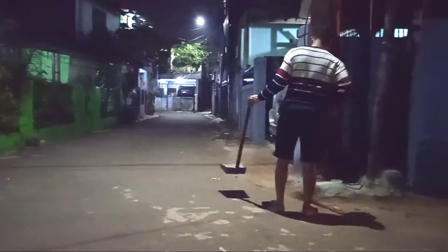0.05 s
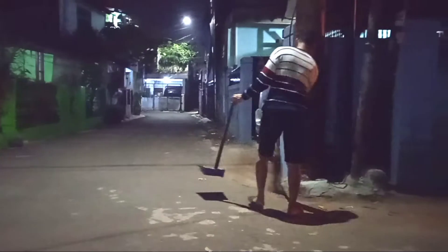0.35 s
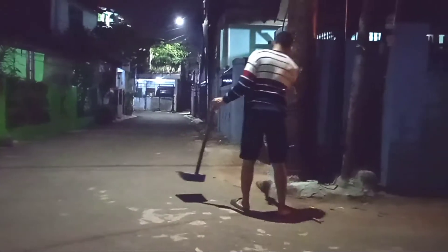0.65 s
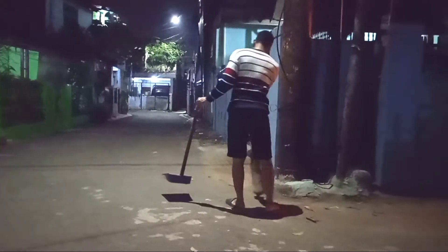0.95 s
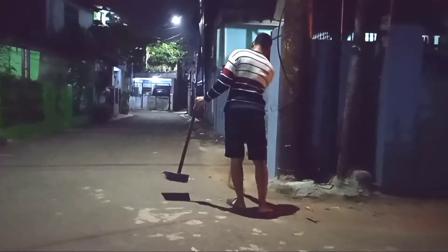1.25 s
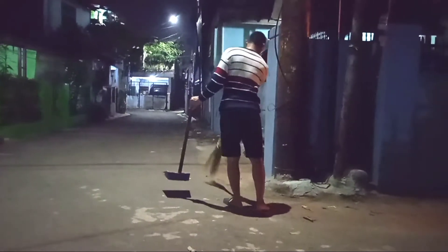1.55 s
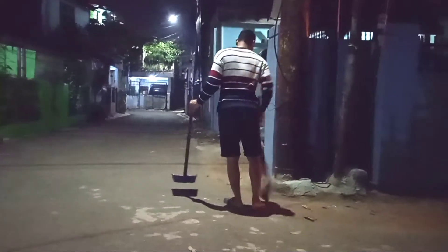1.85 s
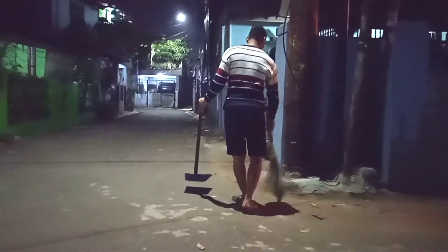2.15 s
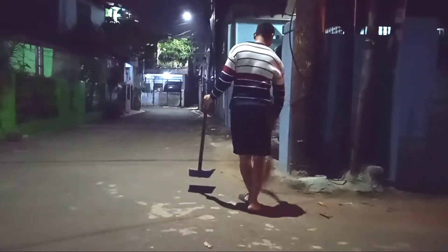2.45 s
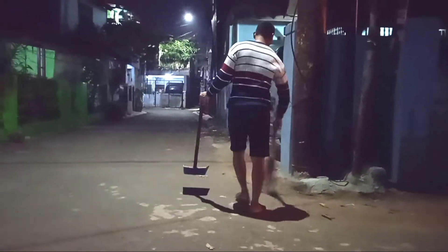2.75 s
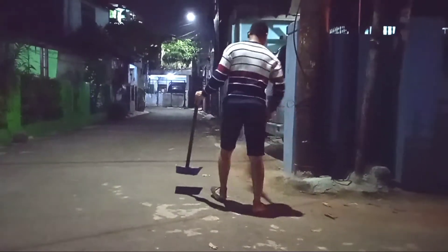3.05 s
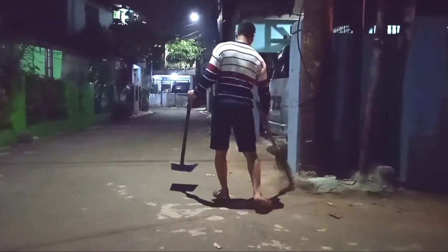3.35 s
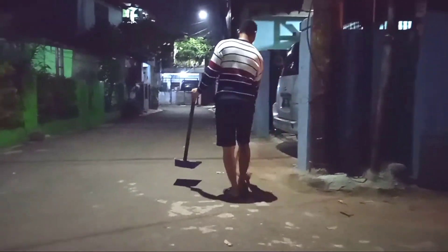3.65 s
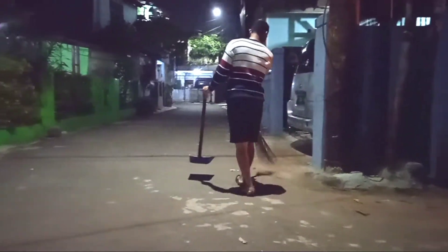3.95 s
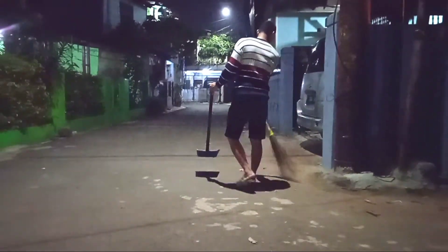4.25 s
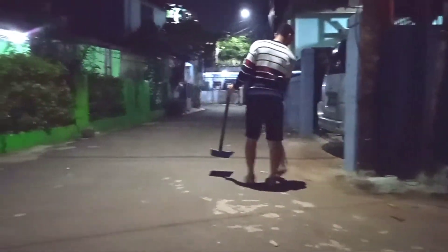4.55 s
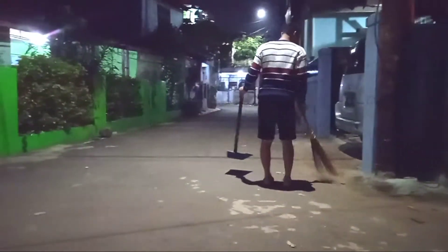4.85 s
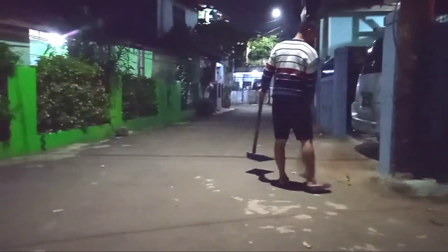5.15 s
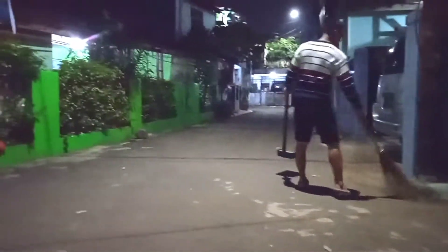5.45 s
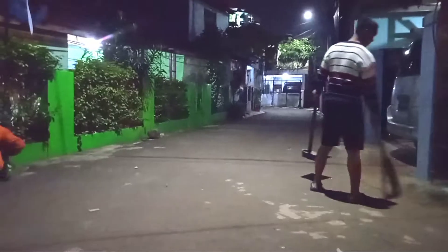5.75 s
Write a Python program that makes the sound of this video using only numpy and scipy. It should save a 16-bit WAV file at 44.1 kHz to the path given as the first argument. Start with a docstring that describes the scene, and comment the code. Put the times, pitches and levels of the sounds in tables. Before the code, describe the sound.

A stiff stick broom sweeps a paved lane, a few metres from a phone microphone. Thirteen dry, scratchy strokes come about two a second, each a bright hiss of bristle tips with a rasp of bending sticks and a short echo off the house fronts. The first four, up to about 1.5 seconds, are light and brief, with tiny ticks of flung grit among them. A dustpan gives one small, sharp knock at about 1.2 seconds. From 1.7 seconds the strokes become fuller and raspier, the strongest at around 3.4 seconds. Slightly softer sweeps follow near 3.9, 4.3 and 4.8 seconds. A longer stroke from 5.3 seconds catches on the rough ground, and a grain of grit ticks clearly at about 5.6 seconds. A faint, low rumble of distant town traffic lies underneath throughout.

```python
"""A stiff stick broom scratches over a paved lane at night: thirteen strokes, a few metres from a phone mic.
Bristle tips catch and flick on the pavement while the sticks bend and rasp; each stroke is combed
by its bounce off the ground and rings on between the house fronts. Town traffic rumbles far off.
Flung grit ticks on the paving, and a dustpan knocks once, just over a second in."""
import sys
import numpy as np
from scipy import signal
from scipy.fft import rfft, irfft, next_fast_len
from scipy.io import wavfile
from scipy.ndimage import map_coordinates

SR = 44100
rng = np.random.default_rng(int(sys.argv[2]) if len(sys.argv) > 2 else 0)


def generate_wav(sig):
    """Save sig (samples, or channels by samples) to the path in sys.argv[1] as 16-bit PCM at SR."""
    pcm = np.round(np.clip(np.atleast_2d(sig).T, -1, 1) * 32767).astype(np.int16)
    wavfile.write(sys.argv[1], SR, pcm)


N = 255339

# Sweeps of the broom, levels relative: touch_s, press_s (touch to full pressure), hold_s, level_db,
# swell_db (rise over press_s), lift_db_per_s, lag_ms (ground bounce), fizz_db, ring_db (bundle)
STROKES = [ (-.04, 0.016, 0.0206, -34.5, 8, 120.5, 1.3, -5.5, -15),
           (0.474, 0.07, 0.046, -36.5, 9, 135.5, 1.07, -2.5, -20),
           (.95, 0.087, 0.027, -39, 2.5, 118, 0.624, -3, -18),
           (1.359, 0.068, 0.019, -37, 9.5, 107, 1.13, -2.5, -15),
           (1.747, .13, 0.0635, -31.5, 12, 166, 1.1, .5, -7),
           (2.098, 0.16, .035, -29, 31.5, 140, 1.005, 2, -3.5),
           (2.519, 0.12, 0.041, -29.5, 25.5, 151, .99, 2, -3),
           (2.866, 0.0871, 0.042, -32.5, 17.5, 88, 0.996, 0, -3),
           (3.21, 0.2059, 0.029, -26.5, 31, 150, 1.06, 1, 1.5),
           (3.836, 0.058, 0.0645, -33.5, 21, 165.5, 1.23, -3, -7),
           (4.264, 0.074, 0.011, -30, 10.5, 148, 1.24, -3.5, -5),
           (4.699, 0.12, 0.108, -33.5, 12.5, 108, 1.342, -6.5, -8.5),
           (5.29, 0.084, .18, -32, 18, 95, 1.3, -3.3, -9)]
# Bristles snag on a rough spot and bite harder: centre_s, boost_db
SNAGS = [(1.029, 9), (4.442, 5.5), (5.408, 4), (5.535, 2.5)]
# The sweeper's way along the lane, as heard at the mic: time_s, bounce_gain, rasp_db
ROUTE = [(0, 0.127, -8), (2.9, 0.138, -9), (3.9, 0.28, -12.5), (5.5, 0.43, -11.5)]
# Hiss of the bristle tips: frequency_hz, level_db
TIP_COLOUR = [(400, -32.5), (1200, -23), (2600, -6.5), (3300, -5.5), (4200, -1.5), (4900, 0.2), (5800, -2),
              (7400, 4), (8500, -2.6), (9600, -13.5), (12000, -15.5), (16000, -15)]
# Rasp of the bending sticks: frequency_hz, level_db
STICK_COLOUR = [(200, -33), (500, -12), (800, -11.5), (1150, -6), (1500, 2.5), (1800, -8), (2100, 4.5),
                (2550, -2.5), (3400, 0), (6000, -71.5)]
# Resonance of the tied bundle: frequency_hz, level_db
BUNDLE_COLOUR = [(1000, -50.5), (1850, -5), (2060, 1), (2300, -13.5), (4000, -43)]
# Fine fizz of tips on dust: frequency_hz, level_db
FIZZ_COLOUR = [(6000, -32), (8500, 4), (10000, 0.5), (11800, 0), (13500, -3.5), (16000, -1.5)]
# Traffic heard from far across town: frequency_hz, level_db
TOWN_COLOUR = [(20, -12.5), (38, -20), (55, -7), (80, 1.5), (130, -1), (195, -1), (240, -11), (310, -8.5),
               (400, -14), (800, -17.5), (1600, -20), (3000, -28.5), (8000, -30), (14000, -40)]
# Single grains landing on the pavement: start_s, peak_db
GRIT_TICKS = [(.300, -45), (.356, -37.5), (.373, -45), (.725, -42), (.804, -45), (.850, -45), (.867, -44),
              (4.231, -47), (4.257, -39), (5.648, -29)]
# Tick of one grain: frequency_hz, level_db
GRIT_COLOUR = [(300, -40), (1200, -20), (2500, -7), (4500, -2), (7500, 0), (10000, -7), (16000, -17)]
# Three quick contacts that make up the dustpan's knock: start_s, peak_db
PAN_CONTACTS = [(1.228, -39), (1.235, -26), (1.2515, -37)]
# Damped modes of the pan: pitch_hz, level_db, t60_s
PAN_MODES = [(1300, -15, .012), (2100, 0, .022), (2280, 1, .018), (3300, -8, .01), (4200, -18, .008),
             (5600, -16, .006), (6900, -15, .006)]
# The microphone port rings just under the top of its range: frequency_hz, gain_db
MIC_PORT = [(13600, 0), (14050, 4), (14500, 13), (14950, 19.5), (15400, 20), (15700, 15)]
# Faint left-right difference added to the top treble of an otherwise mono mix: frequency_hz, gain_db
SIDE_COLOUR = [(2000, -62.5), (7000, -65), (10000, -42.5), (13300, -16), (14600, -54)]

LANDING_S, LIFTED_DB = .019, 30  # tips land over this time; about this far down the broom is clear
SNAG_HALF_S, SNAG_RASP_SHARE = 0.021, 0.75  # a snag grips the tips; the sticks get a share of its dB
TOWN_DB, TOWN_FADE_DB_PER_S = -51.5, 0.62
MIC_TOP_HZ = 15480


def undb(db):
    """Decibels to gain."""
    return 10 ** (np.asarray(db) / 20)


def unit(x):
    """Scale to rms 1."""
    return x / np.sqrt(np.mean(x ** 2))


def colour(x, points):
    """Causal filter through (frequency_hz, level_db) points, built from the cepstrum of its gain."""
    size = 2 * next_fast_len(len(x))
    hz, db = np.transpose(points)
    curve_db = np.interp(np.log(np.fft.rfftfreq(size, 1 / SR) + 1), np.log(hz), db)
    cepstrum = irfft(np.log(undb(curve_db)))
    cepstrum[1:size // 2] *= 2
    cepstrum[size // 2 + 1:] = 0
    return irfft(rfft(x, size) * np.exp(rfft(cepstrum)))[:len(x)]


def lowpass(x, hz):
    """Gentle low-pass without delay."""
    return signal.sosfiltfilt(signal.butter(2, hz, fs=SR, output="sos"), x)


def delayed(x, lag_ms):
    """x reaching the mic over a longer path, which may change with time."""
    return map_coordinates(x, [np.arange(len(x)) - lag_ms * SR / 1000], order=3)


def walk(per_s, size):
    """Random levels joined smoothly; spread near 1."""
    at = np.arange(size) * per_s / SR
    return map_coordinates(rng.standard_normal(int(at[-1]) + 2), [at], order=2, mode="nearest")


def add(out, start_s, x):
    """Mix x into out from start_s on."""
    i = max(int(start_s * SR), 0)
    out[i:i + len(x)] += x[:max(len(out) - i, 0)]


def flicks(size, per_s, spread_db, bunch_db):
    """Random clicks of uneven size that come in bunches, as when bristle tips slip free."""
    clicks = (rng.random(size) < per_s / SR) * rng.choice([-1, 1], size)
    force_db = spread_db * np.minimum(rng.standard_normal(size), 2)
    return unit(clicks * undb(force_db + bunch_db * walk(170, size)))


def chatter(size, low_hz, high_hz, ring_s, per_s):
    """Single sticks judder for a moment, each at its own wavering, sliding pitch."""
    out = np.zeros(size)
    span = np.linspace(-2, 2, int(4 * ring_s * SR))
    for when, pitch, slide, force in rng.random((int(per_s * size / SR) + 1, 4)):
        bend = 1 + 0.03953 * (slide - .5) * span + 0.013 * walk(314, len(span))
        hz = low_hz * (high_hz / low_hz) ** pitch * bend
        judder = (.5 + force) * np.exp(-span ** 2) * np.sin(2 * np.pi * np.cumsum(hz) / SR)
        add(out, when * size / SR - ring_s, judder)
    return unit(out)


def tip_hiss(size):
    """Tips catch and flick on the pavement, thick enough to hiss; some squeak."""
    tips = flicks(size, per_s=11000, spread_db=3, bunch_db=0.5)
    squeaks = chatter(size, low_hz=3200, high_hz=9500, ring_s=.009, per_s=260)
    return unit(unit(colour(tips, TIP_COLOUR)) + undb(-6) * unit(colour(squeaks, TIP_COLOUR)))


def stick_rasp(size, ring_db):
    """Bending sticks rasp and judder, and the tied bundle rings."""
    sticks = flicks(size, per_s=4500, spread_db=5, bunch_db=-1.5)
    judder = chatter(size, low_hz=1450, high_hz=2400, ring_s=0.015, per_s=70)
    bundle = unit(colour(rng.standard_normal(size), BUNDLE_COLOUR))
    return unit(colour(sticks, STICK_COLOUR)) + undb(-9) * judder + undb(ring_db) * bundle


def dust_fizz(size):
    """Tips on dust give a fine, flickering fizz in the top treble."""
    dust = flicks(size, per_s=14000, spread_db=3, bunch_db=1.6)
    return unit(colour(dust, FIZZ_COLOUR)) * undb(-3 + 0.91 * walk(70.7, size))


def arm_pressure(since_s, press_s, hold_s, swell_db, lift_db_per_s):
    """The arm leans on the broom, holds it down and lifts it: dB relative to full pressure."""
    leaning_db = -swell_db * np.clip(1 - since_s / press_s, 0, 1)
    return leaning_db - lift_db_per_s * np.maximum(since_s - press_s - hold_s, 0)


def near_bounces(direct, swing_s, lag_ms, bounce_gain):
    """Pavement, legs, kerb and pole throw copies at the mic; their shifting lags comb the stroke."""
    # the ground bounce comes sooner through the swing; the spread of the tips blurs its treble
    ground = lowpass(delayed(direct, lag_ms - 0.072 * swing_s), hz=6300)
    nearby = sum(delayed(direct, 2.4 + 1.8 * where + .7 * drift * swing_s)
                 for where, drift in rng.uniform(-1, 1, (4, 2)))
    return bounce_gain * ground + .11 * nearby


def stroke(touch_s, press_s, hold_s, level_db, swell_db, lift_db_per_s, lag_ms, fizz_db, ring_db):
    """One sweep, a few metres off: tips hiss, sticks rasp, and harder pressure brings out the fizz."""
    size = int(np.round(press_s + hold_s + LIFTED_DB / lift_db_per_s, 1) * SR)
    t = max(touch_s, 0) + np.arange(size) / SR
    pressure_db = arm_pressure(t - touch_s, press_s, hold_s, swell_db, lift_db_per_s)
    snag_db = sum(db * np.exp(-((t - centre_s) / SNAG_HALF_S) ** 2) for centre_s, db in SNAGS)
    contact = np.clip((t - touch_s) / LANDING_S, 0, 1) * np.minimum((t[-1] - t) / 0.0037, 1)
    middle_s = touch_s + press_s + hold_s / 2
    swing_s = t - middle_s
    drag = np.tanh(swing_s / 0.15)  # tips land first: fizz leads, rasp grows as the sticks bend
    route_s, *route = np.transpose(ROUTE)
    bounce_gain, rasp_db = (np.interp(middle_s, route_s, column) for column in route)
    hiss = tip_hiss(size)
    rasp = stick_rasp(size, ring_db + 0.16 * pressure_db)
    rasp *= undb(rasp_db - 0.18 * pressure_db + 0.68 * drag)
    fizz = dust_fizz(size) * undb(fizz_db + 0.219 * pressure_db - 1.1 * drag)
    direct = (hiss + fizz) * undb(snag_db) + rasp * undb(SNAG_RASP_SHARE * snag_db)
    direct *= undb(level_db + pressure_db - 1.03) * contact
    return direct + near_bounces(direct, swing_s, lag_ms, bounce_gain)


def lane(x, wet_db, mid_t60_s=0.628, top_t60_s=0.47, build_s=0.0061):
    """A sound plus its scattered echoes off the house fronts, new for each spot; the treble dies first."""
    t = np.arange(SR) / SR
    noise = rng.standard_normal(SR)
    low = lowpass(noise, hz=8250)
    tail = low * 1000 ** (-t / mid_t60_s) + 0.716 * (noise - low) * 1000 ** (-t / top_t60_s)
    response = undb(wet_db) * unit(tail * np.minimum(t / build_s, 1) ** 2) / np.sqrt(SR)
    response[0] = 1  # straight path to the mic
    return signal.fftconvolve(x, response)


def broom():
    """The sweeper works along the lane, each stroke echoing from its own spot."""
    out = np.zeros(N)
    for touch_s, *gesture in STROKES:
        add(out, touch_s, lane(stroke(touch_s, *gesture), wet_db=-12.5))
    return out


def town():
    """Far traffic: a wavering rumble slowly recedes under a smooth, faint hiss."""
    air = unit(colour(rng.standard_normal(N), TOWN_COLOUR))
    rumble = lowpass(air, hz=202)
    waver_db = 1.2 * walk(9, N)
    fade_db = -TOWN_FADE_DB_PER_S * (np.arange(N) - N / 2) / SR
    hiss = (air - rumble) * undb(.5 * walk(3.99, N))
    return undb(TOWN_DB) * (rumble * undb(fade_db + waver_db) + hiss)


def grit():
    """Flung grains tick on the pavement; finer ones patter faintly in flurries throughout."""
    out, t = np.zeros(N), np.arange(SR // 20) / SR
    for start_s, peak_db in GRIT_TICKS:
        tick = colour(rng.standard_normal(len(t)) * np.exp(-t / .003), GRIT_COLOUR)
        add(out, start_s, tick * undb(peak_db) / np.abs(tick).max())
    patter = flicks(N, per_s=320, spread_db=5, bunch_db=3) * undb(3 * walk(12, N))
    return out + undb(-70) * unit(colour(patter, GRIT_COLOUR))


def dustpan():
    """Soft, slightly rough contacts ring the pan's damped modes; so small a pan radiates no bass."""
    out, t = np.zeros(N), np.arange(SR // 10) / SR
    ring = sum(undb(db) * 1000 ** (-t / t60_s) * np.sin(2 * np.pi * hz * t)
               for hz, db, t60_s in PAN_MODES)
    ring = signal.sosfilt(signal.butter(3, [1500, 7500], "band", fs=SR, output="sos"), ring)
    for start_s, peak_db in PAN_CONTACTS:
        push = 0.11 * rng.standard_normal(len(t)) * np.exp(-t / 0.0022)
        push[0] += 1
        knock = signal.fftconvolve(push, ring)
        add(out, start_s, knock * undb(peak_db) / np.abs(knock).max())
    return out


def scene():
    """Broom, town, grit and pan in mono, with a faint left-right difference added to the top treble."""
    mid = broom() + lane(grit() + dustpan(), wet_db=-13.5)[:N] + town()
    scatter = unit(rng.standard_normal(256)) / np.sqrt(256)
    side = colour(signal.fftconvolve(mid, scatter)[:N], SIDE_COLOUR)
    return np.array([mid + side, mid - side])


def record(dry):
    """The phone microphone: its port resonance, then a steep top cut."""
    heard = np.array([colour(channel, MIC_PORT) for channel in dry])
    return signal.sosfilt(signal.ellip(12, .2, 80, MIC_TOP_HZ, fs=SR, output="sos"), heard)


dry = scene()
out = record(dry)
generate_wav(out)
```